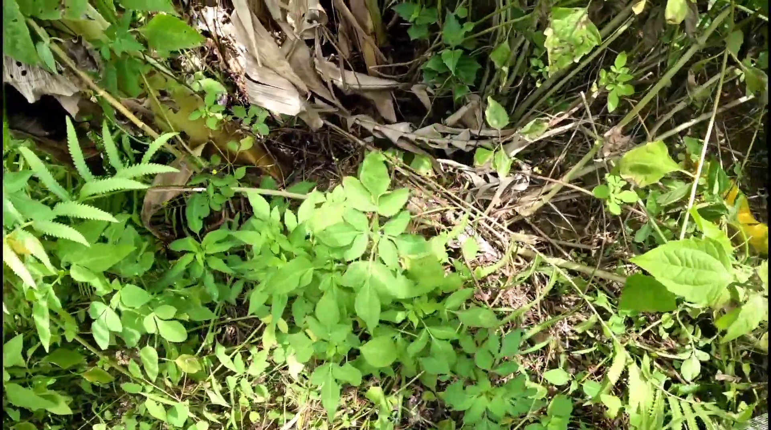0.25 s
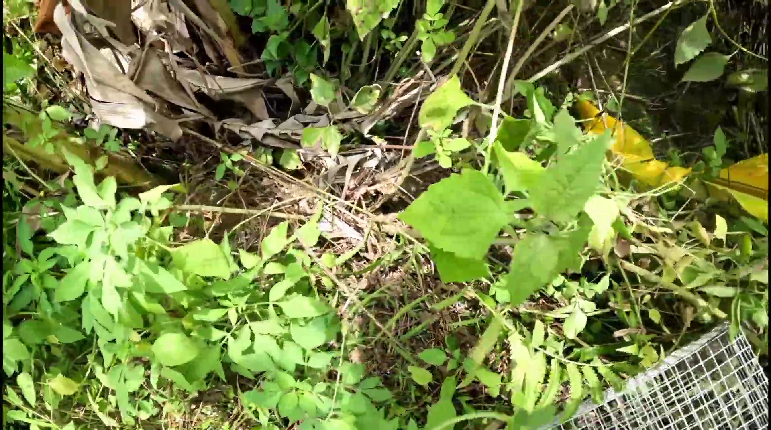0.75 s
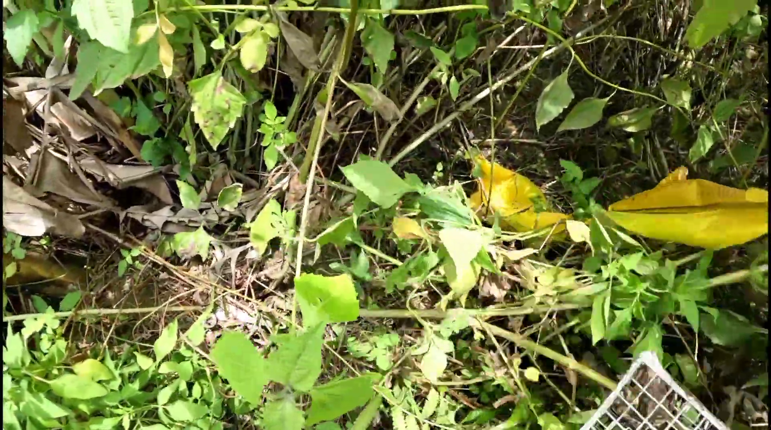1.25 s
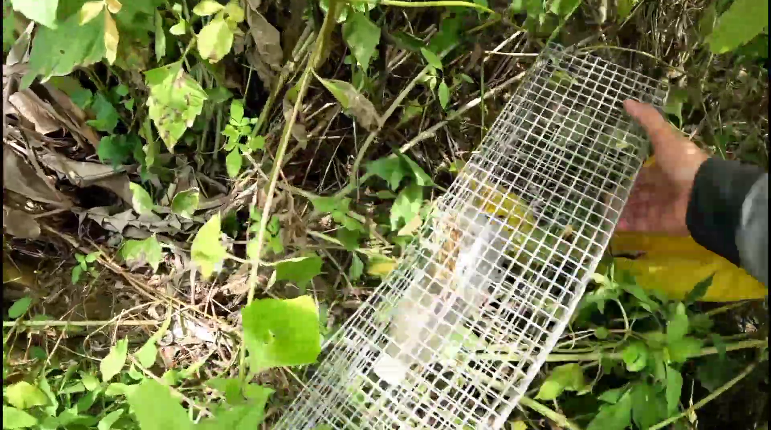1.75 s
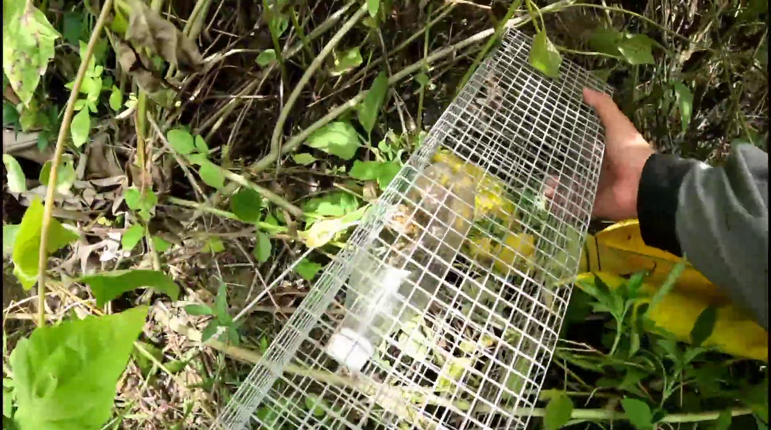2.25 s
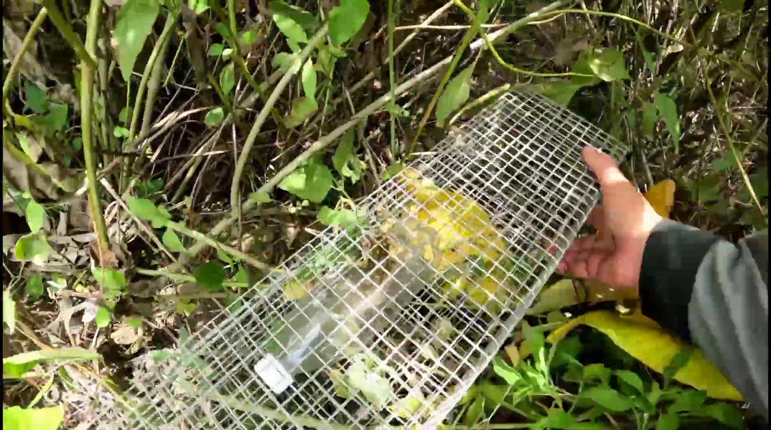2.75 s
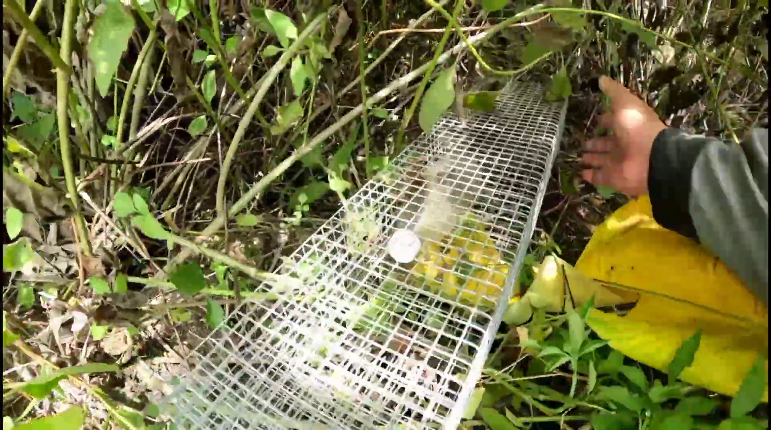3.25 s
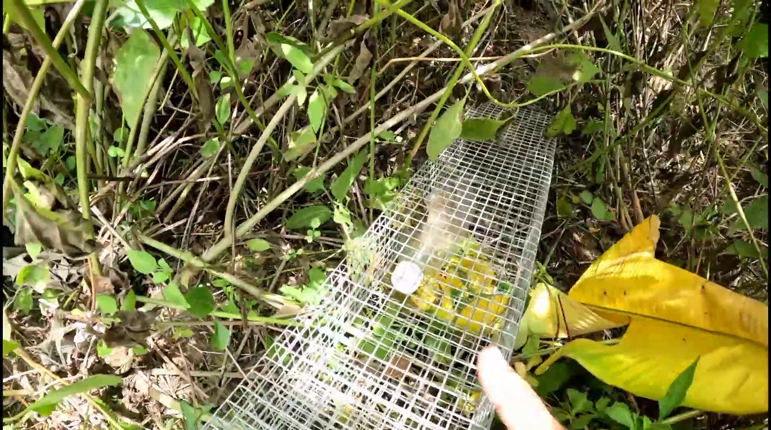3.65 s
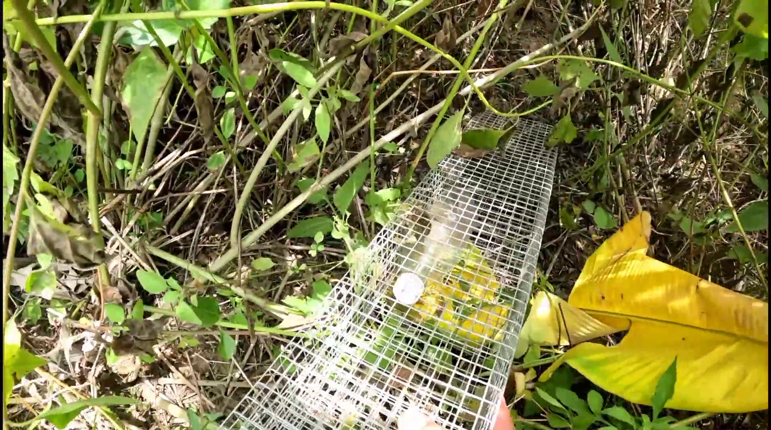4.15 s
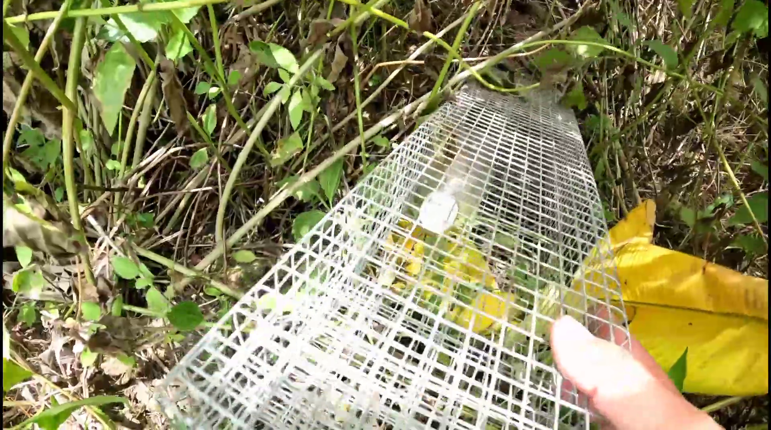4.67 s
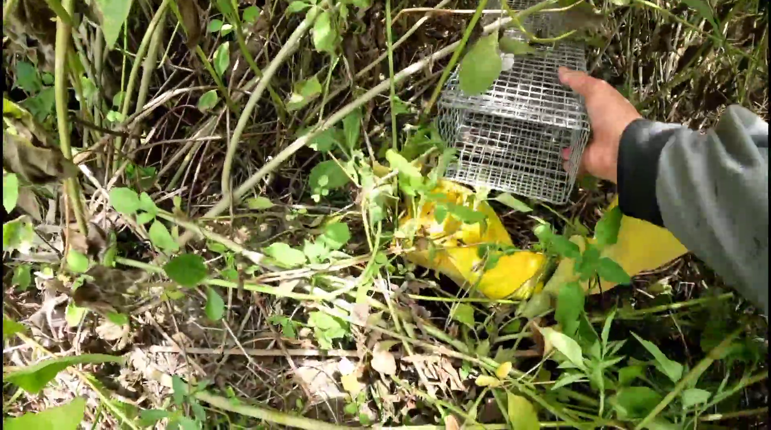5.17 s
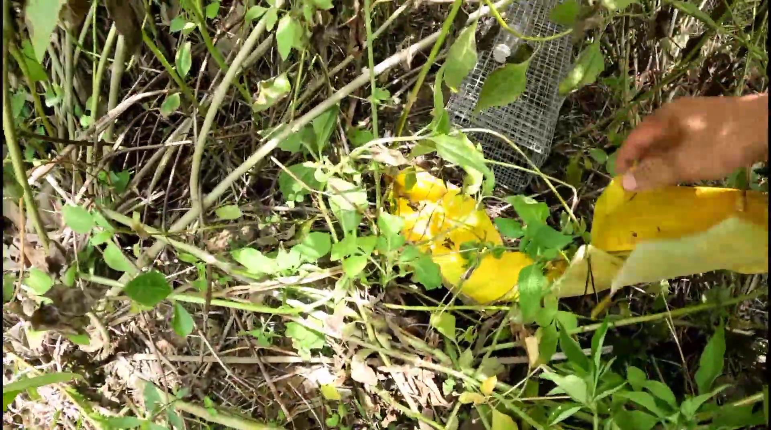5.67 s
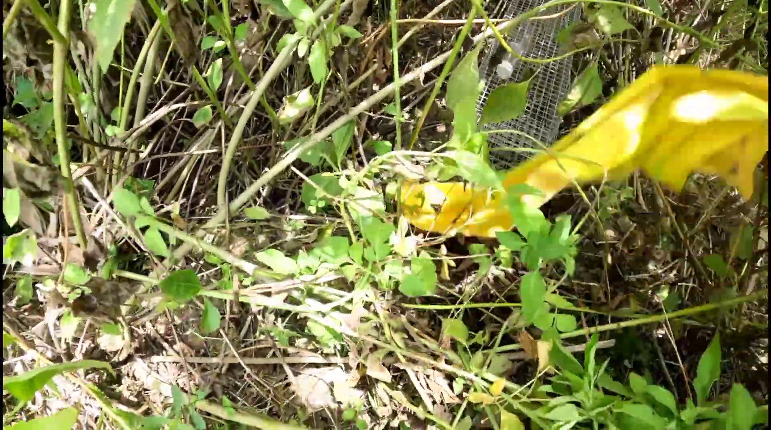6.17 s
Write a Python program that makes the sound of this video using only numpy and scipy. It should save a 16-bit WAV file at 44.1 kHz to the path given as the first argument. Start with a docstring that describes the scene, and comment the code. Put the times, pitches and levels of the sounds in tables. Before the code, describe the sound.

A light wire cage is jostled, set down and pushed among crackling leaves, its mesh clattering briefly, over a constant high insect hiss.

```python
"""Insects hiss steadily all around while a wire cage trap is carried through dry undergrowth,
set down and pushed under leaves: its mesh rattles and knocks, leaves swish and twigs snap.
Light wind buffets the microphone. Insects, wind and brushing leaves are shaped noise, dry leaves are
crackling grains, and the cage is a set of short wire modes shaken by slips and jolts.
"""
import sys
import numpy as np
from scipy import signal
from scipy.fft import rfft, irfft, next_fast_len
from scipy.io import wavfile
from scipy.ndimage import uniform_filter1d

SR = 44100
rng = np.random.default_rng(int(sys.argv[2]) if len(sys.argv) > 2 else 0)


def to_wav(s):
    """Save 16-bit WAV."""
    ch = np.atleast_2d(s).T  # columns
    pcm = np.round(np.clip(ch, -1, 1) * 32767)  # PCM
    wavfile.write(sys.argv[1], SR, pcm.astype(np.int16))


N = 282681

# Ringing modes of the wire mesh: pitch_hz, relative_level_db, t60_s (time to fall 60 dB)
MESH_MODES = [(385, 3.5, 0.01), (514, 1.5, 0.032), (591, 2, 0.0087), (803, -3.5, 0.029), (954, -1.5, 0.037),
              (1070, -3, 0.028), (1180, -4.5, 0.055), (1307, 3.5, 0.016), (1446, -1.5, 0.019),
              (1637, 1, 0.0097), (1814, -1.5, 0.027), (2000, -2.5, 0.025), (2162, -0.5, 0.033),
              (2384, 2, 0.0078), (2813, 0, 0.02), (3246, 6, 0.0067), (3850, 1, 0.016), (4260, -1, 0.062)]
REST_SWISH_DB = -74  # floor of the swish control, with the cage at rest in the hand


def amp(db):
    """Amplitude factor of a level in dB."""
    return 10 ** (np.asarray(db) / 20)


def evened(x):
    """Scales a signal to rms 1."""
    return x / np.sqrt(np.mean(x ** 2) + 1e-20)


def peaked(x, peak_db):
    """Scales a signal to a peak level."""
    return amp(peak_db) * x / abs(x).max()


def read(points, hz):
    """Reads a curve of (Hz, value) points along log frequency."""
    point_hz, value = np.transpose(points)
    return np.interp(np.log(hz + 1), np.log(point_hz + 1), value)


def curves(table):
    """The columns of a table at every sample, the first column being the time in s."""
    s, *columns = np.transpose(table)
    return [np.interp(np.arange(N) / SR, s, column) for column in columns]


def panned(x, lean_db):
    """Spreads a sound over left and right; a positive lean makes the left louder."""
    return x * amp(np.array([lean_db / 2, -lean_db / 2])).reshape(2, -1)


def coloured(x, spectrum):
    """Filters along time by a spectrum in dB."""
    size = next_fast_len(N)
    gain = amp(read(spectrum, np.fft.rfftfreq(size, 1 / SR)))
    return irfft(rfft(x, size) * gain, size)[..., :N]


def band(x, lo_hz, hi_hz):
    """Keeps the band between two frequencies."""
    return signal.sosfilt(signal.butter(2, [lo_hz, hi_hz], "bandpass", fs=SR, output="sos"), x)


def grains(per_s, spread_db):
    """A sparse train of clicks of random sign; a few are large."""
    size = amp(spread_db * np.minimum(rng.exponential(1, N), 4))
    happens = rng.random(N) < per_s / SR
    return size * rng.choice([-1., 1.], N) * happens


def wander(smooth_s):
    """Slow chance of rms 1."""
    width = int(smooth_s * SR)
    smooth = uniform_filter1d(uniform_filter1d(rng.standard_normal(N), width), width)
    return evened(smooth)


def add(mix, s, sound):
    """Lays a sound into the mix from a given second, cut off at the end."""
    part = mix[..., round(s * SR):][..., :sound.shape[-1]]
    part += sound[..., :part.shape[-1]]


def glide(length_s, from_hz, to_hz):
    """Progress from 0 to 1 and the phase in radians of an evenly gliding pitch."""
    along = np.arange(0, 1, 1 / (length_s * SR))
    return along, 2 * np.pi * np.cumsum(from_hz + (to_hz - from_hz) * along) / SR


def insects():
    """Many far singers blur into noise with drifting patches; the faint hush of the wood lies below."""
    # Colour of the chorus and the hush: pitch_hz, relative_level_db per Hz
    chorus_spectrum = [(40, -32), (110, -42), (170, -5), (600, -19), (2500, -24), (3250, -12.5),
                       (3500, -3.5), (4350, -5.5), (4620, 2), (4900, 0), (7300, 1), (8100, -11),
                       (12500, -23.5), (14000, -34), (16000, -57)]
    # Likeness of the two channels: pitch_hz, likeness (1 is the same noise in both)
    likeness = [(60, 0.63), (150, 1), (380, 0.81), (950, 0.21), (2380, 0.19), (5980, 0.82), (15000, 0.13)]
    # Side the chorus leans to: pitch_hz, left_over_right_db
    side_lean = [(60, -1.0), (180, -0.5), (550, 2), (1650, 4), (4970, 0.5), (15000, 8.5)]
    level_db = -39.5  # rms over both channels
    frames, hz = N // 256 + 5, np.fft.rfftfreq(1024, 1 / SR)
    a, b, c, d, patches = rng.standard_normal((frames, 513, 5)).T
    # patches are smooth over 12 bins of pitch and 10 frames of time
    patches = evened(uniform_filter1d(uniform_filter1d(patches, 12, 0), 10, 1))
    same = np.clip(read(likeness, hz), -1, 1)[:, None]
    left = a + 1j * b
    right = same * left + np.sqrt(1 - same ** 2) * (c + 1j * d)
    z = np.array([left, right])
    z *= amp(read(chorus_spectrum, hz)[:, None] + 1.45 * patches)
    z *= amp(np.array([.5, -.5])[:, None] * read(side_lean, hz))[..., None]
    chorus = signal.istft(z, nperseg=1024, noverlap=768)[1][:, :N]
    return amp(level_db) * evened(chorus)


def singer():
    """One nearer insect: a faint, thin tone that wavers in level as it climbs."""
    # Whistles: start_s, length_s, start_pitch_hz, end_pitch_hz
    whistles = [(3.8, 0.38, 4560, 4620), (5.2, 0.65, 4450, 4620)]
    out = np.zeros(N)
    for s, length_s, from_hz, to_hz in whistles:
        along, phase = glide(length_s, from_hz, to_hz)
        add(out, s, np.sqrt(np.sin(np.pi * along)) * np.sin(phase))
    return out * amp(-54 + 3.0 * wander(0.02))


def wind():
    """Lumpy low pressure, partly different at each port; sharper gusts reach higher."""
    # Wind on the microphone: time_s, low_buffet_db, sharper_flutter_db
    gusts = [(0.0, -60, -65), (0.5, -44.5, -76), (1.12, -42, -70), (1.28, -54, -64), (1.64, -47.5, -73.5),
             (2.21, -30.5, -29.5), (2.27, -35.5, -39), (2.52, -40, -43), (2.61, -33, -45),
             (2.66, -39, -43.5), (3.3, -52.5, -52.5), (3.4, -44, -55), (3.72, -37.5, -46),
             (4.0, -50.5, -72), (5.19, -54, -68), (5.25, -54, -40.5), (5.33, -48, -65), (6.09, -58.5, -68),
             (6.41, -46, -47)]
    buffet_db, flutter_db = curves(gusts)
    shared, own = rng.standard_normal((2, 1, N)), rng.standard_normal((2, 2, N))
    air = (shared + 0.79 * own) * amp(2.8 * wander(0.022))
    low = evened(coloured(air[0], [(8, 2.5), (45, -6.0), (68, -16.5), (110, -71)]))
    high = evened(coloured(air[1], [(35, -4.5), (70, -0.5), (140, -4.0), (250, -10.0), (600, -45.5)]))
    return amp(buffet_db) * low + amp(flutter_db) * high * amp([[-1.5], [1.5]])


def puffs():
    """Each puff striking the microphone is a soft swing of pressure that dies within two cycles."""
    # Puffs: start_s, peak_db (before the lean), pitch_hz, left_over_right_db
    strikes = [(2.036, -24, 50.7, -6), (2.108, -20, 144, -8), (2.164, -26.5, 64, -6), (2.195, -25, 143, -7),
               (2.213, -20.5, 55.7, 0), (2.37, -27.5, 94.5, -3), (2.594, -27, 50, -5),
               (2.725, -34, 144, -8), (3.575, -36, 47, 3), (3.7, -33.5, 24.3, 17), (5.235, -36, 64, 8),
               (6.259, -31.5, 283, -1), (6.381, -31.5, 240, -1)]
    out, t = np.zeros((2, N)), np.arange(5000) / SR
    for s, peak_db, hz, lean_db in strikes:
        swing = np.sin(2 * np.pi * hz * t) * t * np.exp(-2.5 * hz * t)
        add(out, s, panned(peaked(swing, peak_db), lean_db))
    return out


def shoving():
    """Shoves through the plants add up in power: rattle dB, swish dB, mean pitch of the wires touched."""
    # Shoves of the cage: peak_s, build_up_s, dying_s, rattle_db, swish_db, wire_centre_hz
    # (the levels are controls, trimmed in rattle() and leaves())
    shoves = [(0.0, .05, 0.14, -42, -48.5, 915), (0.52, 0.31, 0.059, -40, -40, 1270),
              (0.534, 0.014, 0.094, -29.5, -59, 1050), (0.75, 0.15, 0.21, -42.5, -45.5, 1130),
              (0.98, 0.22, 0.24, -45, -74, 684), (1.29, 0.096, 0.1, -32, -41.5, 950),
              (1.39, 0.019, 0.2, -30.5, -38, 910), (1.68, 0.089, 0.42, -38.5, -40, 1070),
              (1.86, 0.05, 0.1, -29, -41, 1270), (1.959, 0.068, 0.1, -26.5, -35.5, 920),
              (2.08, 0.2, 0.39, -33.5, -44.5, 1040), (2.52, 0.1, 0.022, -34.5, -43.5, 1110),
              (2.62, 0.12, 0.16, -30.5, -42, 1010), (2.98, 0.16, 0.26, -34, -41, 1110),
              (3.11, 0.16, 0.17, -29.5, -37, 890), (3.271, 0.17, 0.067, -29, -35.5, 1000),
              (3.43, 0.047, 0.16, -30, -41, 1040), (3.88, 0.1, 0.11, -51, -50.5, 1600),
              (4.398, 0.33, 0.44, -46.5, -50.5, 1270), (4.96, 0.075, 0.19, -45.5, -44.5, 875),
              (5.08, 0.036, 0.068, -34, -36.5, 1250), (5.18, 0.13, 0.31, -42.5, -43.5, 1510),
              (5.35, 0.22, 0.35, -45.5, -50.5, 1330), (5.58, 0.17, 0.088, -41, -45.5, 1047),
              (5.758, 0.3, 0.2, -41.5, -48, 990), (6.31, 0.32, 0.053, -36, -40, 1980),
              (6.41, 0.079, 0.081, -28, -38.5, 1430)]
    range_db = 12  # a shove grows and dies by this much in the times given
    rest_rattle_db, rest_hz = -72, 1410  # the cage at rest in the hand
    peak_s, build_s, dying_s, rattle_db, swish_db, hz = np.transpose(shoves)[..., None]
    t = np.arange(0, N, 44) / SR
    below_db = range_db * np.maximum((peak_s - t) / build_s, (t - peak_s) / dying_s)
    rattling = amp(2 * (rattle_db - below_db))  # doubled dB give power
    swishing = amp(2 * (swish_db - below_db))
    rest = amp(2 * rest_rattle_db)
    power = rattling.sum(0) + rest
    centre_hz = ((rattling * hz).sum(0) + rest * rest_hz) / power  # the strongest shove weighs most
    swish = swishing.sum(0) + amp(2 * REST_SWISH_DB)
    return curves(np.transpose([t, 10 * np.log10(power), 10 * np.log10(swish), centre_hz]))


def leaves():
    """Dense tiny crackles in clumps, from a bright swish to a duller crunch."""
    # Colour of the swish: pitch_hz, relative_level_db
    bright_spectrum = [(300, -33), (1500, -35), (3000, 9), (6000, 19.5), (9000, -6.5), (12500, 11),
                       (14000, -27), (16000, -31)]
    # Colour of the crunch: pitch_hz, relative_level_db
    dull_spectrum = [(300, -12.5), (1500, 7), (3000, 9), (6000, 11.5), (9000, 5.5), (12500, -2.5),
                     (14000, -10.5), (16000, -26)]
    dull_at_rest, dull_per_db = 0.49, 5  # share of crunch: all of it from about 0.1 dB above rest
    swish_db = shoving()[1]
    shared = grains(5000, 1.4)
    crackle = np.array([shared + 0.67 * grains(5000, 4.3) for ear in range(2)])
    crackle = crackle * amp(2.0 * wander(0.017))
    bright, crunch = coloured(crackle, bright_spectrum), coloured(crackle, dull_spectrum)
    scale = np.std(band(bright, 8360, 11840))
    dull = np.clip(dull_at_rest + dull_per_db * (swish_db - REST_SWISH_DB), 0, 1)
    return amp(swish_db - 3.5) * ((1 - dull) * bright + dull * crunch) / scale


def brushes():
    """Large leaves crumple in one stroke: gritty noise in short folds, a fast swell and a quick end."""
    # Strokes: start_s, noise_level_db (before swell, folds and lean), centre_hz, length_s, width_octaves
    strokes = [(0.55, -31, 3200, 0.0094, 0.7), (1.254, -37.5, 770, 0.14, 1.04),
               (1.377, -41, 2500, 0.027, 0.6), (3.866, -40.5, 1760, 0.028, 2), (4.278, -54.5, 310, 0.14, 1),
               (4.445, -42.5, 1280, 0.041, 4), (5.052, -26, 2780, 0.026, 2.4),
               (5.56, -37.5, 1280, 0.087, 1.2), (5.727, -43.5, 1520, 0.18, 2.1),
               (6.22, -32, 1950, 0.049, 1.03), (6.292, -29.5, 3300, 0.043, 1.0),
               (6.363, -29.5, 1720, 0.053, 3.3)]
    rise_s, end_s = 0.0013, 0.0065
    out, t = np.zeros((2, N)), np.arange(6000) / SR
    chance = rng.standard_normal((len(strokes), 4, 6000))
    for (s, level_db, hz, length_s, octaves), (a, b, c, folds) in zip(strokes, chance):
        grit = np.array([a + 0.24 * b, a + 0.5 * c])
        half_width = 2 ** (octaves / 2)
        noise = evened(band(grit * abs(grit), hz / half_width, hz * half_width))
        swell = 1 - np.exp(-t / rise_s)
        dying = np.exp(-.8 * t / length_s - np.maximum(t - length_s, 0) / end_s)
        stroke = swell * dying * amp(0.67 * evened(uniform_filter1d(folds, 200)))
        add(out, s, panned(amp(level_db) * noise * stroke, -2.0))
    return out


def snaps():
    """Each twig or dry leaf snaps in a gritty burst around its own pitch, starting hard and dying fast."""
    # Snaps: start_s, peak_db (before the lean), centre_hz, left_over_right_db, dying_s (to 1/e)
    breaks = [(0.578, -21, 4040, -3, 0.0066), (0.6569, -23, 4200, -2, 0.0045),
              (0.7528, -24.5, 4380, -10, 0.0049), (0.753, -24.5, 10500, 1.0, 0.008),
              (0.8132, -27, 5550, -3, 0.0043), (0.932, -25.5, 4600, -1, 0.0052),
              (1.1308, -24, 4100, 1.0, 0.0093), (1.705, -26, 2500, 0, 0.004),
              (1.8252, -17, 1970, -4, 0.0074), (1.943, -16, 7240, -0.5, 0.0031),
              (2.1063, -14.5, 1320, -1, 0.0024), (2.3578, -19.5, 5740, 0.5, 0.00092),
              (2.464, -31, 7300, 0.5, 0.0061), (3.2411, -22, 3780, -3, 0.004),
              (3.2454, -21, 5000, -0.5, 0.004), (3.2598, -14, 7760, 1.0, 0.004),
              (3.267, -17, 6900, -1.0, 0.0039), (3.424, -22.5, 4300, -10, 0.004),
              (5.05, -18, 7400, 0, 0.004), (5.069, -18, 6100, 1, 0.0043), (5.0728, -20, 6500, 1, 0.004),
              (5.076, -24, 4000, -2, 0.003), (5.084, -21, 3970, -3, 0.0029),
              (5.099, -18.5, 5100, -2, 0.006), (5.1712, -16.5, 7460, 1, 0.0023),
              (5.173, -33, 2210, -6, 0.0032), (5.5672, -20.5, 4900, -3, 0.0058),
              (5.5678, -25.5, 1420, -2, 0.0023), (6.1283, -22.5, 2100, -6, 0.0042)]
    out, t = np.zeros((2, N)), np.arange(1500) / SR
    chance = rng.standard_normal((len(breaks), 1500))
    for (s, peak_db, hz, lean_db, dying_s), noise in zip(breaks, chance):
        burst = band(noise * abs(noise), 0.54 * hz, min(1.27 * hz, 15000)) * np.exp(-t / dying_s)
        crack = np.sin(2 * np.pi * hz * t) * np.exp(-.45 * hz * t)  # the break itself
        burst += 1.25 * abs(burst).max() * crack
        add(out, s, panned(peaked(burst, peak_db), lean_db))
    return out


def slide():
    """A wire slides over a stem: broken friction in a resonance gliding with the free length of wire."""
    # Slides: start_s, length_s, level_db (rms before the swell), start_pitch_hz, end_pitch_hz
    slides = [(2.201, 0.027, -40.5, 1190, 1290), (2.642, 0.088, -40.5, 1000, 1020),
              (4.193, 0.2, -54.5, 1580, 1520), (4.223, 0.1, -54, 940, 950), (4.925, 0.15, -46, 710, 1030),
              (5.277, 0.14, -46.5, 1460, 1450)]
    out, friction = np.zeros(N), grains(900, 1.2) * amp(1.0 * wander(0.015))
    r = np.exp(-np.pi * 130 / SR)  # each of two equal poles is 130 Hz wide
    for s, length_s, level_db, from_hz, to_hz in slides:
        along, phase = glide(length_s, from_hz, to_hz)
        turn = np.exp(1j * phase)
        # shift the pitch down to zero, smooth there, shift back up
        slow = signal.lfilter([1], [1, -2 * r, r ** 2], friction[round(s * SR):][:len(along)] / turn)
        swell = np.sqrt(np.sin(np.pi * along))
        add(out, s, amp(level_db) * swell * evened((slow * turn).real))
    return out


def rings(size):
    """Each mode of the mesh after one tap, with like energy but for its own level."""
    hz, db, t60 = np.transpose(MESH_MODES)[..., None]
    t = np.arange(size) / SR
    return amp(db - 60 * t / t60) * np.sin(2 * np.pi * hz * t) / np.sqrt(t60)


def nearness(hz, centre_hz, octaves, far):
    """Wires near the touched place ring most."""
    return far + np.exp(-(np.log2(hz / centre_hz) / octaves) ** 2)


def rattle():
    """Clumped slips along the stems, each ringing one wire."""
    rattle_db, _, centre_hz = shoving()
    clumps = amp(1.8 * wander(0.024))
    slips = [nearness(hz, centre_hz, 0.8, 0.82) * clumps * evened(grains(260, 3.66))
             for hz, _, _ in MESH_MODES]
    ringing = signal.oaconvolve(slips, rings(size=6000), axes=1)[:, :N].sum(0)
    running_rms = np.sqrt(abs(uniform_filter1d(ringing ** 2, 9000)) + 1e-12)
    return amp(rattle_db - 5.0) * ringing / running_rms


def knocks():
    """A quick press and a dying run of jolts, each shaking the mesh differently."""
    # Knocks on the cage: start_s, peak_db (before the cage's band and lean), struck_wire_centre_hz
    blows = [(0.219, -36.5, 1070), (0.334, -33.5, 1130), (0.523, -25.5, 540), (0.527, -23.5, 1780),
             (0.534, -24.5, 766), (0.576, -20, 1076), (0.656, -31, 1100), (0.76, -31.5, 1180),
             (0.832, -33, 980), (1.252, -31.5, 443), (1.278, -29, 500), (1.304, -27.5, 507),
             (1.308, -28.5, 1160), (1.388, -22.5, 1165), (1.421, -25.5, 930), (1.456, -29, 825),
             (1.478, -33, 950), (1.526, -29, 910), (1.57, -33.5, 818), (1.595, -34, 716), (1.644, -34, 940),
             (1.706, -27.5, 980), (1.825, -31, 1390), (1.852, -20.5, 1210), (1.892, -28, 1210),
             (1.913, -32, 1150), (1.974, -26, 1220), (2.108, -28, 1270), (2.14, -30, 765),
             (2.268, -29.5, 1190), (2.48, -28.5, 1120), (2.586, -30, 2090), (2.614, -23.5, 520),
             (2.616, -18.5, 950), (2.626, -26, 920), (2.968, -28.5, 1060), (3.062, -25, 1060),
             (3.236, -28, 830), (3.276, -25, 820), (3.385, -29, 845), (3.416, -21, 776), (3.47, -28, 847),
             (3.504, -27.5, 930), (3.553, -30, 1430), (3.582, -30.5, 1520), (5.051, -20, 1114),
             (5.083, -25.5, 1260), (5.572, -28, 1690), (5.584, -33, 1590), (5.589, -32, 935),
             (5.612, -34, 980), (6.123, -28, 1470), (6.181, -30.5, 1470), (6.365, -32, 1120)]
    out, modes, t = np.zeros(N), rings(size=5000), np.arange(1500) / SR
    hz = np.transpose(MESH_MODES)[0]
    press = 1 - np.exp(-t / 0.0014)
    dying = np.exp(-t / 0.0094) + 0.93 * np.exp(-t / 0.0014)
    chance = rng.standard_normal((len(blows), len(MESH_MODES), 1500))
    for (s, peak_db, struck_hz), jolts in zip(blows, chance):
        jolts = jolts * abs(jolts) * dying * press
        shaken = signal.fftconvolve(jolts, modes, axes=1)
        add(out, s, peaked(nearness(hz, struck_hz, 0.16, 0.041) @ shaken, peak_db))
    return out


def thicket(x):
    """Stems and ground scatter a short tail, different at each port."""
    t = np.arange(4000) / SR
    hits = rng.random((2, 4000)) < .05
    taps = rng.choice([-1., 1.], (2, 4000)) * hits * amp(-60 * t / 0.19)  # falls 60 dB in 0.19 s
    return signal.oaconvolve(x, taps / np.linalg.norm(taps[0]), axes=1)[:, :N]


def scene():
    """The cage, snaps and brushes with their scattered tail, amid leaves, wind and insects."""
    cage = panned(band(rattle() + knocks() + slide(), 127, 14000), -0.8)
    near = cage + snaps() + brushes()
    return near + amp(-10.0) * thicket(near) + leaves() + wind() + puffs() + insects() + singer()


def record(dry):
    """The band limit of the recorder: a low-pass at 16.3 kHz."""
    lowpass = signal.firwin(511, 16300, window=("kaiser", 9), fs=SR)
    return signal.oaconvolve(dry, lowpass[None], "same")


dry = scene()
out = record(dry)
to_wav(out)
```